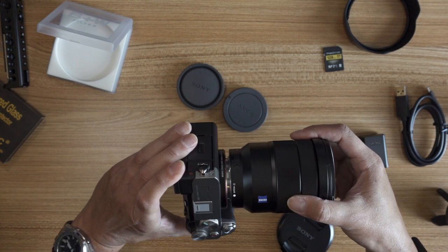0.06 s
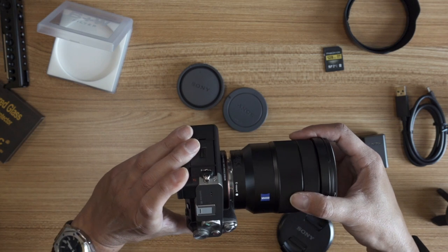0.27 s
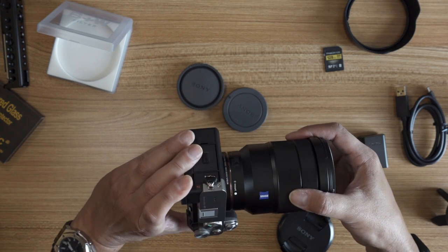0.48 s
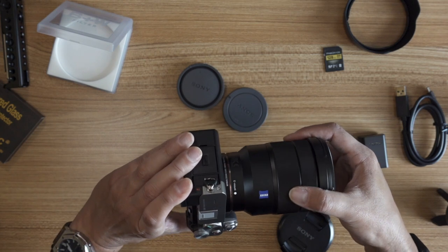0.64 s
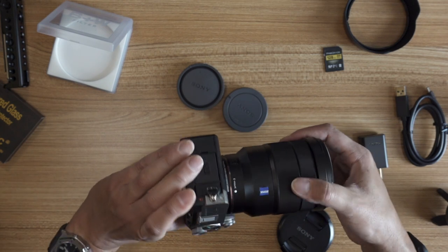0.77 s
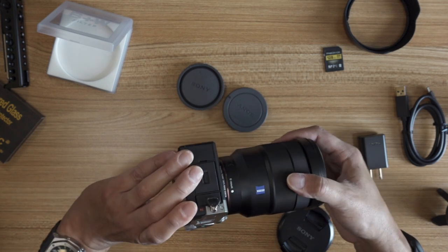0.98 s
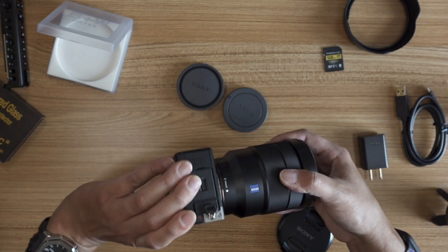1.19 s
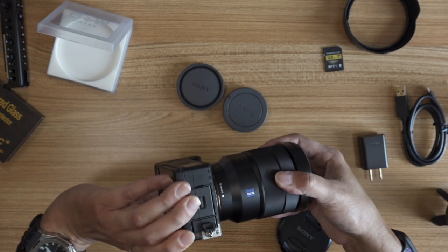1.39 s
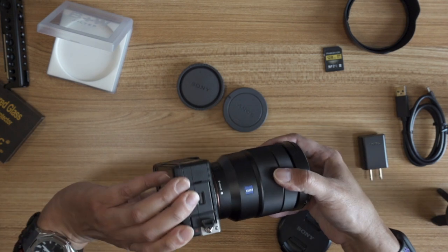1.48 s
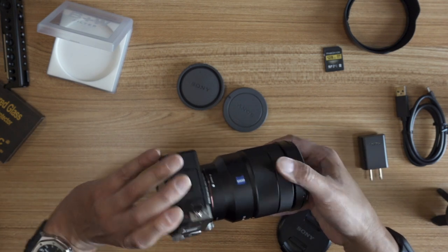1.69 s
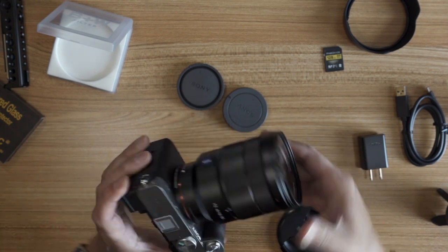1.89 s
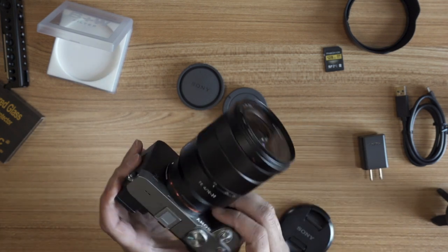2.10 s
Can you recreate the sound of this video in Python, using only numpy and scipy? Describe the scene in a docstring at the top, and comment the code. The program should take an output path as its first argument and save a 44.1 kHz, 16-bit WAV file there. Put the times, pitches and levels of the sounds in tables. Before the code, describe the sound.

Lens attached to a camera body: solid hollow clack, small tick, crisp locking snap, faint handling

```python
"""A low ventilation hum and soft scuffs come first, then a zoom lens seats on a camera with a hollow clack.
The lens turns past the sprung locking pin, the pin snaps home, and fingers shift and tick on the barrel.
Hits and their echoes are made of fading sine waves plus short noise bursts; sliding is swelling, rough noise.
Shaped noise makes the hum and air, and fading stereo noise gives the small, lightly ringing room.
"""
import sys
import numpy as np
from scipy import signal
from scipy.fft import rfft, irfft, next_fast_len
from scipy.io import wavfile
from scipy.ndimage import map_coordinates

SR = 44100
rng = np.random.default_rng(int(sys.argv[2]) if len(sys.argv) > 2 else 0)


def generate_wav(sig):
    """Save sig (samples, or channels by samples) to the path in sys.argv[1] as 16-bit PCM at SR."""
    pcm = np.round(np.clip(np.atleast_2d(sig).T, -1, 1) * 32767).astype(np.int16)
    wavfile.write(sys.argv[1], SR, pcm)


N = 94462  # length in samples

# Background hum and air, before each is scaled to its overall level: [pitch_hz, relative_level_db]
HUM_COLOUR = [(25, -26), (45, -41), (65, -22.5), (95, -5.5), (118, 1.5), (138, -11), (165, 3), (195, -8.5),
              (240, -14.5), (320, -32.5), (500, -45), (1000, -48)]
AIR_COLOUR = [(100, 8.5), (400, 1.5), (700, -0.5), (950, 3.5), (1200, -4), (1550, 3), (1900, -4.5),
              (2100, 7.5), (2260, 7.5), (2480, -5.5), (3000, -6), (4000, -9.5), (8000, -16.5), (16000, -27)]
# How alike the air is in both ears: [pitch_hz, likeness (1 = same, 0 = unrelated)]
AIR_LIKENESS = [(100, 1), (400, 0.13), (1000, 0.083), (10000, 0.15)]
HUM_DB, AIR_DB = -52, -58.5

# How long the room's tail takes to fall by 60 dB: [pitch_hz, fall_60db_s]
ROOM_FALL = [(150, .33), (500, 0.38), (1500, 0.34), (4000, 0.33), (8000, 0.35), (15000, 0.39)]
# Tone of the room's answer: [pitch_hz, relative_level_db]
ROOM_TONE = [(100, 5), (400, -1.5), (900, -0.5), (2000, -5.5), (3800, 6.5), (6000, -1), (14000, 1.5)]
# How alike the room's answer is in both ears: [pitch_hz, likeness (1 = same, 0 = unrelated)]
ROOM_LIKENESS = [(200, 1), (600, 0.77), (2000, 0.68), (5000, 0.45), (12000, 0.53)]
TAIL_DB, EARLY_DB = -2, -8
EARLY_FALL_S, BUILD_S = 0.13, 0.0046  # early sound's 60 dB fall; time scale of the room's build-up

# Left-right balance of the handled camera: [pitch_hz, left_minus_right_db]
CAMERA_BALANCE = [(500, -0.3), (1500, -.8), (4000, -1.5), (10000, -3)]
BASS_CUT_HZ, TOP_HZ = 72, 16000

# Mount sliding on its flange: [centre_s, swell_s (from the peak down to 1/e), level_db]
MOUNT_SCUFFS = [(.005, 0.0067, -52), (.026, .01, -44.5), (.199, .014, -49.5), (.414, 0.0024, -51),
                (.428, 0.0062, -35.5), (.698, .018, -51)]
# Fingers sliding on the barrel: [centre_s, swell_s (from the peak down to 1/e), level_db]
FINGER_RUBS = [(.197, 0.0034, -58.5), (1.785, 0.064, -63), (1.956, 0.052, -65.5)]
# Tone of the mount's sliding: [pitch_hz, relative_level_db]
SCUFF_TONE = [(100, -24), (300, -0.5), (460, -0.5), (620, -4), (830, -3.5), (1000, -2.5), (1400, 6.5),
              (1800, -9.5), (2300, -6), (3000, -14), (6500, -15), (9000, -24.5), (16000, -49)]

# Contacts of barrel and grip, locking pin and spring, and lens mount;
# rows 1.4045, 1.439 and .463 are echoes of the click and the clack:
# [start_s, level_db, brightness_db_per_octave, scrape_s (scrape envelope falls 30 dB), extra_ring_db]
BARREL_TICKS_AND_ECHOES = [(.366, -66, 3, 0.025, -6), (.9398, -34, -6.5, 0.0087, -5),
                           (1.128, -53.5, -2.5, 0.017, -15), (1.394, -47, -4, 0.014, 9),
                           (1.4045, -37, -2.5, 0.0046, 8.5), (1.439, -36.5, 1.5, 0.007, -12),
                           (1.763, -57, 1, 0.022, -3), (1.811, -43, 2, 0.0074, 5.5),
                           (1.909, -51.5, 0, 0.014, 2), (1.941, -44, -2.5, 0.022, 0),
                           (1.951, -54, 2.5, 0.011, 8), (1.975, -53.5, 4, 0.016, -10),
                           (2.046, -54.5, -2.5, 0.024, -2), (2.1245, -39, 1.5, 0.017, -2)]
PIN_CLICKS = [(.915, -45, -1.5, 0.0092, -18), (.918, -34, -3, 0.01, -2), (1.381, -41, 5, 0.0075, -5),
              (1.385, -22, 1.5, 0.0017, 2.5), (1.3866, -22.5, 5, 0.0025, -13), (1.3882, -34, -5, .004, -21)]
MOUNT_KNOCKS_AND_ECHO = [(.0245, -41, -4, .012, 1.5), (.031, -47.5, -5, 0.006, 2),
                         (.4222, -39, 1.2, 0.013, -3), (.426, -32, -1.5, 0.0072, 0),
                         (.4378, -34, -3, 0.0052, -4), (.4405, -13.5, .7, 0.0067, 1),
                         (.4425, -16, 0.5, 0.0064, -27), (.4475, -17.5, 0, 0.0092, -10),
                         (.4525, -19, -2.5, 0.017, -8.5), (.463, -30, 3.5, 0.013, -26),
                         (.53, -37.5, 2, 0.0084, 1.5), (.9175, -37, -2.5, 0.0076, -18)]
# Ringing of the barrel, the steel mount, and camera and lens together:
# [pitch_hz, relative_level_db, fall_60db_s]
BARREL_RING = [(3330, -3, 0.03), (3725, -2.5, 0.03), (4100, -21, 0.027), (4870, 0.5, 0.024),
               (5570, -5.5, 0.021), (8800, -15, .015), (9740, -6, .02)]
STEEL_RING = [(362, -14.5, 0.099), (481, -15.5, 0.069), (1464, -0.5, 0.026), (2290, 4.5, 0.024),
              (2677, -22.5, 0.38), (3468, -11, 0.053), (3750, -12, 0.072), (5310, -7, 0.047),
              (5960, -6, .025), (6750, -31, 0.012), (7580, -3, 0.0067), (8700, -22, .015),
              (9840, -10, 0.018)]
BODY_RING = [(237, -8, 0.047), (428.8, -1.5, 0.16), (517, -3, 0.078), (774, -4, 0.057), (872, -4.5, 0.077),
             (1192, -2, 0.12), (1300, 2, 0.054), (1445, 3, .08), (1730, -17, 0.045), (1810, -14, 0.19),
             (2183, -10, 0.15), (2380, -6, 0.13), (2787, -7.5, 0.11), (3750, -14, .06), (3890, -8, 0.046),
             (4470, -12, 0.053), (5250, -14, 0.06), (6170, -21, .05)]
# Tone of the contact noise of barrel, steel and body: [pitch_hz, relative_level_db]
BARREL_NOISE = [(200, -23), (2000, -15.5), (3400, 5.5), (5000, 0.5), (7200, -4), (9800, -6.5),
                (12000, -18.5), (16000, -30)]
STEEL_NOISE = [(100, -18), (400, -15), (900, -1), (2000, 4.5), (2900, 3.5), (4200, 3), (6000, 0),
               (9000, -6), (12000, -16), (16000, -20)]
BODY_NOISE = [(40, -20), (150, -48), (300, -3.5), (650, -6), (1000, -8.5), (1400, 6), (2500, -8),
              (6000, -9), (10000, -19.5), (16000, -34)]


def amp(db):
    """Turn decibels into a multiplier."""
    return 10 ** (np.asarray(db) / 20)


def unit(x):
    """Scale to an average strength (rms) of 1."""
    return x / np.sqrt(np.mean(x ** 2) + 1e-20)


def fade(t, t60):
    """Die away exponentially, dropping 60 dB in t60 seconds."""
    return amp(-60 * t / np.maximum(t60, 1e-4))


def along(points, hz):
    """Read a value between table points on a logarithmic pitch axis."""
    f, v = np.transpose(points)
    return np.interp(np.log(hz + 1), np.log(f + 1), v)


def filtered(x, response):
    """Make each pitch louder or softer by the given response."""
    n = x.shape[-1]
    padded = next_fast_len(n + 4096)
    spectrum = rfft(x, padded)
    hz = np.fft.rfftfreq(padded, 1 / SR)
    return irfft(spectrum * response(hz), padded)[..., :n]


def noise(colour, likeness, size):
    """Make coloured stereo noise: a shared middle plus a side that is opposite in the two ears."""
    def response(hz):
        angle = np.arccos(np.clip(along(likeness, hz), -1, 1)) / 2
        return amp(along(colour, hz)) * [np.cos(angle), np.sin(angle)]

    mid, side = filtered(rng.standard_normal((2, size)), response)
    return unit(np.array([mid + side, mid - side]))


def grit(colour, size):
    """Make coloured mono noise with an rms of 1."""
    return unit(filtered(rng.standard_normal(size), lambda hz: amp(along(colour, hz))))


def background():
    """Add a nearly mono ventilation hum to faint air with a raised band near 2.2 kHz."""
    hum = amp(HUM_DB) * noise(HUM_COLOUR, [(100, .99)], N)
    air = amp(AIR_DB) * noise(AIR_COLOUR, AIR_LIKENESS, N)
    return hum + air


def room(x):
    """Add quick desk reflections and a wall tail, made of fresh fading noise at every call."""
    size = SR // 3
    t = np.arange(size) / SR
    diffuse = noise(ROOM_TONE, ROOM_LIKENESS, size)
    # Let each pitch of the tail die away at its own speed.
    hz, frames, z = signal.stft(diffuse, SR, nperseg=256)
    faded = z * fade(frames, along(ROOM_FALL, hz)[:, None])
    tail = signal.istft(faded, SR)[1][:, :size]
    # Reversed noise gives the early reflections a different random pattern.
    early = diffuse[:, ::-1] * fade(t, EARLY_FALL_S)
    build = 1 - np.exp(-(t / BUILD_S) ** 2)
    answer = amp(TAIL_DB) * unit(tail * build) + amp(EARLY_DB) * unit(early * build)
    answer = answer / np.sqrt(size)
    return signal.fftconvolve(x[None], answer, axes=1)[:, :len(x)]


def rubbing(strokes, colour, rough_db, grain_hz):
    """Imitate surfaces that stick and slip: swelling noise with uneven loudness."""
    t = np.arange(N) / SR
    swell = sum(amp(db) * np.exp(-((t - centre) / width) ** 2) for centre, width, db in strokes)
    hiss = grit(colour, N)
    # Smoothly join random values, with grain_hz new values each second.
    slips = map_coordinates(rng.standard_normal(N // 10), [t * grain_hz])
    return swell * unit(hiss * amp(rough_db * slips))


def friction():
    """Let the mount scuff its flange and fingers slide on the barrel, with room sound."""
    scuffs = rubbing(MOUNT_SCUFFS, SCUFF_TONE, rough_db=1.5, grain_hz=496)
    rubs = rubbing(FINGER_RUBS, BARREL_NOISE, rough_db=3, grain_hz=370)
    dry = scuffs + rubs
    return dry + room(dry)


def lean(x, tilt):
    """Tilt the tone by so many dB per octave from 400 Hz to 12 kHz: hard contacts are brighter."""
    return filtered(x, lambda hz: amp(tilt * np.log2(np.clip(hz, 400, 12000) / 2000)))


def even(burst):
    """Make all pitches equally strong, keeping the burst's phases and energy."""
    z = rfft(burst)
    flat = z / (np.abs(z) + 1e-12)
    return irfft(flat, len(burst)) * np.linalg.norm(burst)


def ringing(modes, t):
    """Add fading sine waves, as a struck solid part vibrates at several pitches."""
    hz, level_db, t60 = np.transpose(modes)[:, :, None]
    signs = (-1) ** np.arange(len(hz))[:, None]
    size = amp(level_db + rng.normal(0, 1, hz.shape)) * signs  # each sound varies a little
    return np.sum(size * fade(t, t60) * np.sin(2 * np.pi * hz * t), axis=0)


def scraping(length, colour, crack_db, rattle_db, rattle_t60, t):
    """Make a short scrape and a dense rattle of the parts inside from fading noise."""
    crack = amp(crack_db) * fade(t, 2 * length)
    rattle = amp(rattle_db) * fade(t, rattle_t60)
    shape = crack + rattle
    burst = even(rng.standard_normal(len(t)) * shape)
    burst = burst * np.minimum(1, 10 * shape / shape[0])  # quiet the late part again
    return filtered(burst, lambda hz: unit(amp(along(colour, hz))))


def contacts(events, modes, colour, ring_db, crack_db, rattle_db, rattle_t60, wet_db, ring_wet_db):
    """Build each contact or echo from a ring and a scrape, then send both into the room."""
    out = np.zeros((2, N + SR))
    t = np.arange(SR // 3) / SR
    for start, db, tilt, length, extra_ring_db in events:
        ring = amp(ring_db + extra_ring_db) * ringing(modes, t)
        scrape = scraping(length, colour, crack_db, rattle_db, rattle_t60, t)
        ring, scrape = lean(np.array([ring, scrape]), tilt)
        to_room = amp(ring_wet_db) * ring + amp(wet_db) * scrape
        heard = ring + scrape + room(to_room)
        out[:, round(start * SR):][:, :len(t)] += amp(db) * heard
    return out[:, :N]


def barrel_ticks_and_echoes():
    """Tick the barrel and grip with high, short ringing, also used for two echoes of the click."""
    return contacts(BARREL_TICKS_AND_ECHOES, BARREL_RING, BARREL_NOISE, ring_db=-8.5, crack_db=-4,
                    rattle_db=-21, rattle_t60=0.043, wet_db=-1.5, ring_wet_db=-4)


def pin_clicks():
    """Click the locking pin and bayonet spring, ringing the steel mount."""
    return contacts(PIN_CLICKS, STEEL_RING, STEEL_NOISE, ring_db=-9, crack_db=-4.5,
                    rattle_db=-25, rattle_t60=0.044, wet_db=2.5, ring_wet_db=-0.5)


def mount_knocks_and_echo():
    """Knock the mount so camera and lens ring as a hollow clack, and add one echo of the clack."""
    return contacts(MOUNT_KNOCKS_AND_ECHO, BODY_RING, BODY_NOISE, ring_db=-10.5, crack_db=-4,
                    rattle_db=-23.5, rattle_t60=0.037, wet_db=0, ring_wet_db=-5)


def scene():
    """Place the handled camera a little to the right and add the background."""
    camera = friction() + barrel_ticks_and_echoes() + pin_clicks() + mount_knocks_and_echo()
    halves = np.array([[.5], [-.5]])  # share the balance between left and right
    placed = filtered(camera, lambda hz: amp(along(CAMERA_BALANCE, hz) * halves))
    return background() + placed


def record(dry):
    """Cut the deep bass, and cut very steeply above the top pitch, as the recorder does."""
    bass_cut = signal.butter(2, BASS_CUT_HZ, "high", fs=SR, output="sos")
    thin = signal.sosfilt(bass_cut, dry)
    return filtered(thin, lambda hz: 1 / np.sqrt(1 + (hz / TOP_HZ) ** 200))


dry = scene()
out = record(dry)
generate_wav(out)
```